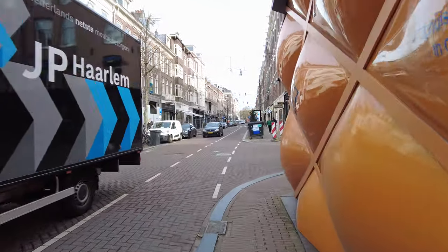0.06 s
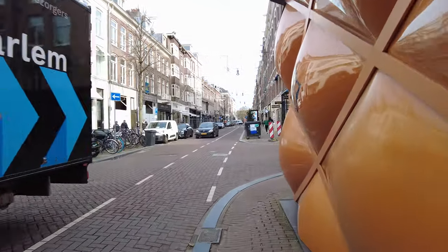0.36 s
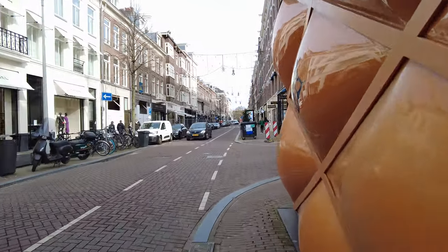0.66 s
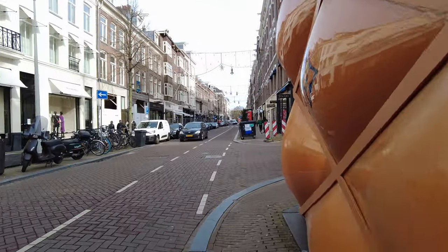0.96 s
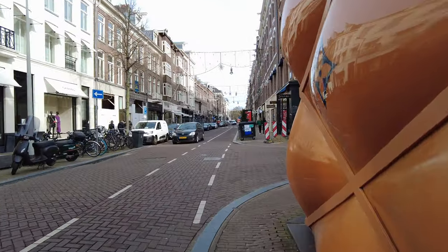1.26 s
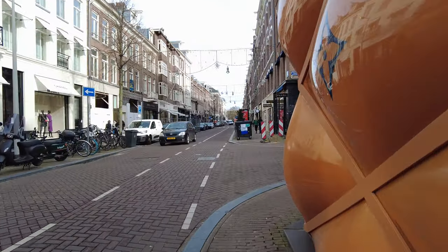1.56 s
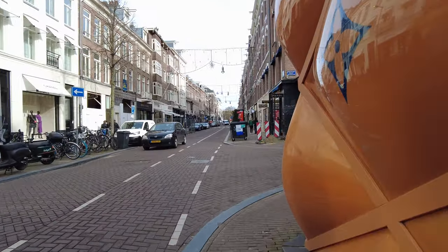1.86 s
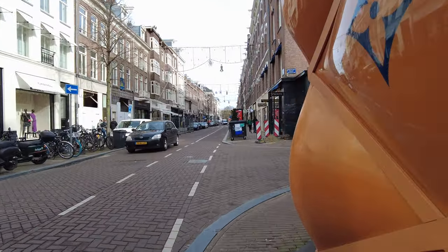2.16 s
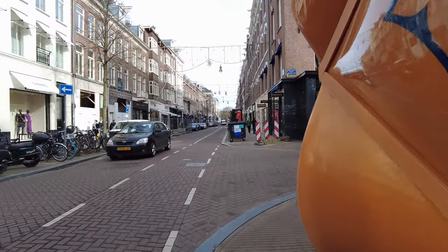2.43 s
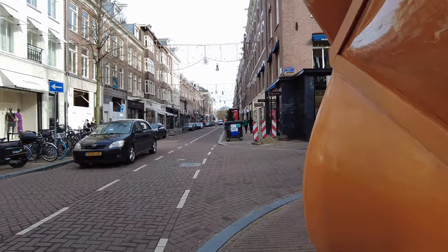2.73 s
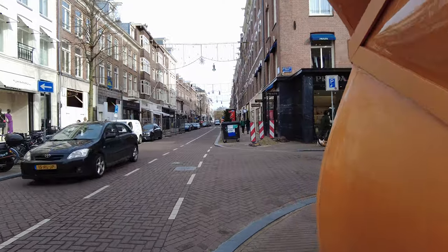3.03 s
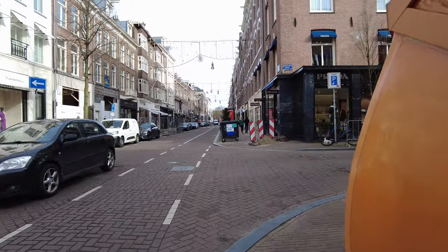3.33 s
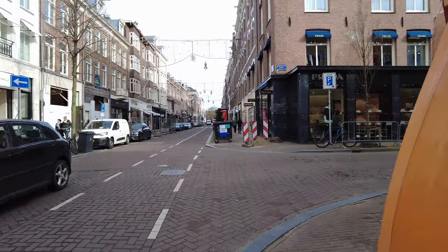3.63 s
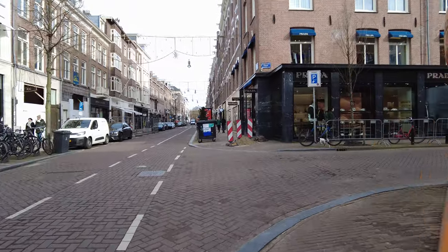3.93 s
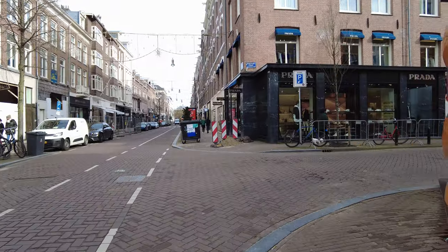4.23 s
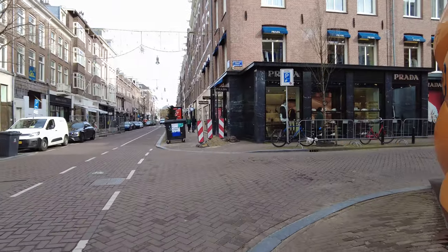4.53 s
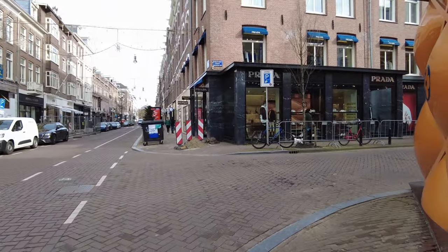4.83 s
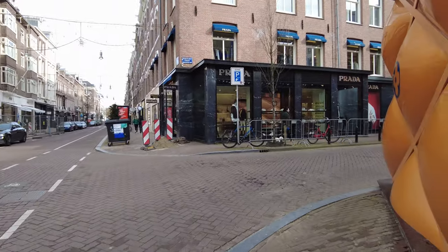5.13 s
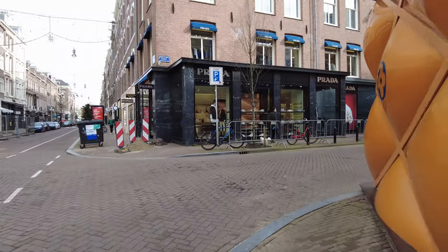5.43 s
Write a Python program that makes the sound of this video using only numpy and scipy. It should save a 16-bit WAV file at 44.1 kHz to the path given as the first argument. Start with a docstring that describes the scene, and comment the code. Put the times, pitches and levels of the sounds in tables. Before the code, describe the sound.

A diesel truck is close at the start, rolling slowly away along a brick-paved street. Its exhaust booms, strongest around 0.6 seconds, and its tyre roar fades gradually. The cargo box throbs deeply at bumps near 1.1 and 2.4 seconds. Faint brief hums and whirrs come and go over distant traffic. The engine swells twice, around 2.8 and 3.4 seconds.

Meanwhile an oncoming car approaches, its tyres roaring and hissing, and passes slightly to the left between 3.5 and 4 seconds, turning hollow as it goes. Loose bricks knock and clink from about 2.9 to 4.7 seconds, echoing briefly off the house fronts. At about 4 seconds a gust buffets the microphone with dull thumps. The truck's rumble drops and the sound narrows to mono by 4.8 seconds. The car's duller rolling noise and light wind flutter continue to the end, near 5.6 seconds.

```python
"""A diesel exhaust booms and a truck's box rumbles as it rolls slowly away along a brick-paved street.
Its treads roar; brief hums and whirrs come and go over far traffic. A car comes the other way and passes:
tyres roar and hiss, loose bricks knock and ring. House fronts echo the bricks and the diesel rattle.
Towards the end a breeze buffets the microphone and the stereo image closes."""
import sys
import numpy as np
from scipy import signal
from scipy.fft import rfft, irfft
from scipy.io import wavfile
from scipy.ndimage import uniform_filter1d, map_coordinates

SR = 44100
rng = np.random.default_rng(int(sys.argv[2]) if len(sys.argv) > 2 else 0)


def master_out(mix):
    """Clip the mix to full scale and print it as 16-bit PCM to the path in sys.argv[1]."""
    frames = np.transpose(np.atleast_2d(mix))
    ceiling = np.clip(frames, -1, 1)
    pcm = np.round(ceiling * 32767).astype(np.int16)
    wavfile.write(sys.argv[1], SR, pcm)


N = 250488
T = np.arange(N) / SR
FREQ = np.maximum(np.fft.rfftfreq(N, 1 / SR), 1)
SPEED_M_S, KERB_M = 7.04, 4.03  # both vehicles


def undb(db):
    """Decibels to gain."""
    return 10 ** (np.asarray(db) / 20)


def unit(x):
    """Scale the mid signal to rms 1."""
    return x / np.std(np.atleast_2d(x).mean(axis=0))


def ramp(start_s, length_s):
    """Linear rise from 0 to 1, then hold."""
    return np.clip((T - start_s) / length_s, 0, 1)


def swell(peak_s, attack_s, release_s):
    """Gaussian rise to 1 and fall."""
    return np.exp(-((T - peak_s) / np.where(T < peak_s, attack_s, release_s)) ** 2)


def noise():
    """Two independent white noises."""
    return rng.standard_normal((2, N))


def walk(rate_hz):
    """Random drift: held steps smoothed twice, rms 1."""
    hold = int(SR / rate_hz)
    steps = np.repeat(rng.standard_normal(N // hold + 1), hold)
    return unit(uniform_filter1d(uniform_filter1d(steps, hold), hold)[:N])


def tone(hz, waver):
    """Sine of rms 1; pitch wavers by a fraction."""
    cycles = np.cumsum(hz * (1 + waver * walk(60))) / SR
    return np.sqrt(2) * np.sin(2 * np.pi * (cycles + rng.random()))


def colour(x, outline):
    """Filter by a (frequency [Hz], gain [dB]) outline."""
    hz, db = np.transpose(outline)
    return irfft(rfft(x) * undb(np.interp(np.log(FREQ), np.log(hz), db)), N)


def band(x, lo_hz, hi_hz):
    """Steep band-pass."""
    return irfft(rfft(x) / np.sqrt((1 + (lo_hz / FREQ) ** 10) * (1 + (FREQ / hi_hz) ** 10)), N)


def ring(x, hz, q):
    """One resonance."""
    return signal.lfilter(*signal.iirpeak(hz, max(q, .3), fs=SR), x)


def pan(x, left_db):
    """Level difference, left over right."""
    return x * undb(np.array([left_db, -left_db]).reshape(2, -1) / 2)


def doublings(nearest_s, nearest_m=KERB_M):
    """Doublings of distance from a passing source's nearest point."""
    return np.log2(np.hypot(1, SPEED_M_S * (T - nearest_s) / nearest_m))


# Street diffuseness: (frequency [Hz], side minus mid [dB])
SIDE_SPECTRUM = [(60, -13), (130, -16), (260, -10.5), (450, -5.5), (750, 2), (1050, 6), (1190, -0.5),
                 (1290, -8), (1500, -8), (2200, -1.5), (3100, -1), (7000, -2), (14000, -0.5)]

def spread(pair):
    """Mid and side to stereo: bass alike in both ears, treble diffuse."""
    return pair[0] + colour(pair[1], SIDE_SPECTRUM) * np.array([[1], [-1]])


def street_echo(x, wet_db, t60_s=0.82):
    """House fronts return a scattered, dull tail to each side."""
    t = T[:SR]
    scatter = signal.lfilter([1], [1, -.6], rng.standard_normal((2, SR)))
    tail = scatter * undb(-60 * t / t60_s) * (t > .012)
    tail /= np.sqrt(np.sum(tail ** 2, axis=1, keepdims=True))
    return x + undb(wet_db) * signal.fftconvolve(np.atleast_2d(x), tail, axes=1)[:, :N]


def late_drop_db():
    """Boom, rumble and rattle drop away quickly as the stereo image closes."""
    return -8 * ramp(4.25, 0.31)


# Throttle pushes: (time [s], boost [dB], attack [s], release [s])
THROTTLE_PUSHES = [(2.78, 7, 0.3, 0.25), (3.38, 10.5, 0.11, 0.084)]
# Exhaust overtones: (frequency [x firing rate], relative level [dB])
ENGINE_ORDERS = [(2, -23), (3, -26), (5, -30), (6, -33.5), (7.5, -36), (10, -36), (11.5, -39)]

def exhaust(firings):
    """The tailpipe booms at the firing rate, louder when near and under load; weak overtones waver."""
    load_db = sum(db * swell(s, attack_s, release_s) for s, db, attack_s, release_s in THROTTLE_PUSHES)
    boom_db = -14.5 - 8 * doublings(nearest_s=0.61, nearest_m=3.7) + load_db + late_drop_db()
    boom = np.sin(2 * np.pi * firings) * undb(boom_db)
    overtones = np.zeros(N)
    for order, db in ENGINE_ORDERS:
        cycles = order * (firings + 0.016 * walk(8.3)) + rng.random()
        overtones += np.sin(2 * np.pi * cycles) * undb(db + 2 * walk(5))
    # overtones carry further than the boom
    return np.sqrt(2) * (boom + overtones * undb(0.67 * boom_db - 10))


# Dips in the paving: (time [s], level [dB])
BOX_JOLTS = [(1.14, -24), (1.87, -31), (2.41, -24.5), (2.9, -35), (3.35, -32.5)]
# Loose box rumble: (frequency [Hz], gain [dB])
BOX_SPECTRUM = [(12, -41), (19, -60), (25, 13.5), (30, 6.5), (45, 2.5), (70, -17), (120, -65)]

def box_rumble(box_hz=33.1, build_s=0.54, jolt_s=0.12):
    """The box throbs on one deep note, harder at each jolt, over a looser rumble."""
    rolling = undb(-35.5 + 2.5 * walk(5.4)) * ramp(0, build_s)
    jolts = sum(undb(db) * swell(s, jolt_s, jolt_s) for s, db in BOX_JOLTS)
    cycles = np.cumsum(box_hz + 0.847 * walk(8.47)) / SR
    throb = np.sqrt(2) * np.sin(2 * np.pi * cycles) * (rolling + jolts)
    loose = unit(colour(rng.standard_normal(N), BOX_SPECTRUM)) * undb(-31)
    return (throb + loose) * undb(late_drop_db())


def diesel_rattle(firings, block_hz=2840, q=3.4, decay_cycles=0.88):
    """Each firing rings the engine block: a dry rasp that carries down the street."""
    bursts = rng.standard_normal(N) * np.exp(-(firings % 1) / decay_cycles) * undb(2 * walk(40))
    block = ring(ring(bursts, block_hz, q), block_hz, q)
    level_db = -66.5 - 0.2 * doublings(0) + late_drop_db()
    return street_echo(unit(block) * undb(level_db), wet_db=-5)


def paving_patches(x, depth_db):
    """Each stretch of paving excites other resonances: narrow bands drift, mostly below 2 kHz."""
    hz, _, cells = signal.stft(x, SR, nperseg=2048, noverlap=1536)
    drift = rng.standard_normal(cells.shape[-2:])
    drift = uniform_filter1d(uniform_filter1d(drift, size=4, axis=0), size=7, axis=1)
    db = depth_db * drift / drift.std() / (1 + (hz[:, None] / 2200) ** 2)
    return signal.istft(cells * undb(db), SR, nperseg=2048, noverlap=1536)[1][..., :N]


def tyres(bands, spectrum, patter_db, patch_db, pulse=1):
    """The body drones, treads roar and rasp as they slap the bricks, grit hisses under them."""
    drone_db, roar_db, rasp_db, hiss_db = (db - fall_db * doublings(s) for s, db, fall_db in bands)
    patter = undb(patter_db * walk(70))
    grains = undb(2.2 * walk(1500))
    tread = colour(spread(paving_patches(noise() * pulse * patter, patch_db)), spectrum)
    grit = colour(spread(noise() * grains), spectrum)
    return (unit(band(tread, 154, 675)) * undb(drone_db + 0.14 * walk(19))
            + unit(band(tread, 762, 1844)) * undb(roar_db)
            + unit(band(grit * patter, 2010, 5300)) * undb(rasp_db)
            + unit(band(grit, 4870, 24000)) * undb(hiss_db))


# Truck drone, roar, rasp, hiss: (peak time [s], level [dB], loss per distance doubling [dB])
TRUCK_BANDS = [(0.25, -39, 5), (-0.48, -42, 5.5), (-0.57, -53, 5), (-0.44, -50, 10)]
# Truck rolling noise: (frequency [Hz], gain [dB])
TRUCK_SPECTRUM = [(150, -2), (200, -1.5), (250, -1.5), (330, -3), (400, -7.5), (520, -6.5), (750, -16.5),
                  (1050, -18), (1450, -16.5), (2200, -22), (3000, -25), (5000, -39), (7800, -43),
                  (8700, -46.5), (9600, -44), (10200, -49), (10900, -45.5), (11600, -51.5), (13000, -51),
                  (15000, -54)]

def truck_tyres(firings):
    """Receding rolling noise; drone and roar pulse with each diesel firing."""
    pulse = 1 + 0.21 * np.exp(-(firings % 1) / 0.6)
    return tyres(TRUCK_BANDS, TRUCK_SPECTRUM, patter_db=0.4, patch_db=3.5, pulse=pulse)


# Far traffic: (frequency [Hz], gain [dB])
TRAFFIC_SPECTRUM = [(35, -11.5), (62, 2), (100, -4.5), (130, -8), (200, -18), (500, -22.5), (1200, -39.5),
                    (2500, -52), (15000, -70.5)]

def far_traffic():
    """Far traffic hums between the houses."""
    return unit(spread(colour(noise(), TRAFFIC_SPECTRUM))) * undb(-37.5 + 1.1 * walk(5.63))


# Hums and whirrs: (time [s], relative level [dB], pitch [Hz], half-length [s])
HUM_NOTES = [(0.08, -40.5, 246, .16), (0.37, -43.5, 291, 0.13), (0.731, -40, 350, 0.21),
             (1.199, -44.5, 294.3, 0.27), (1.445, -46.5, 560, 0.11), (1.47, -42.5, 402, 0.15),
             (2.597, -42, 635, .06), (2.6, -45, 900, 0.031), (2.805, -39.5, 147.4, 0.22),
             (3.006, -38.5, 278.5, 0.029), (3.425, -42, 1254, 0.056), (3.525, -41, 245.8, 0.11),
             (3.716, -42, 1076, 0.05), (3.814, -42, 750, .03), (4.19, -41.5, 400, .06),
             (4.412, -43, 845, 0.019), (4.6, -44, 618, 0.061), (5.223, -47.5, 929, 0.11)]

def brief_hums(gain_db=-5.5, waver=.025):
    """Brief wavering hums and whirrs from engine and tyres."""
    out = np.zeros((2, N))
    for s, db, hz, half_s in HUM_NOTES:
        pair = np.array([tone(hz, waver), tone(hz, waver)])
        out += pair * undb(db + gain_db) * swell(s, half_s, half_s)
    return spread(out)


# Treble sizzles: (time [s], relative level [dB], half-length [s], centre [Hz], filter width [Hz])
SIZZLE_BURSTS = [(0.983, -72, 0.09, 14000, 5000), (1.15, -76, 0.12, 8100, 3500),
                 (1.2, -78, .1, 13700, 2500), (4.186, -63, .022, 4970, 3500), (5.38, -85, .22, 14200, 2000),
                 (5.435, -83, 0.02, 8840, 200)]

def sizzles(gain_db=6.5):
    """Faint, thin bands of treble noise swell and fade."""
    out = np.zeros(N)
    for s, db, half_s, hz, width_hz in SIZZLE_BURSTS:
        q = hz / width_hz
        hiss = ring(ring(rng.standard_normal(N), hz, q), hz, q)
        out += unit(hiss) * undb(db + gain_db) * swell(s, half_s, half_s)
    return out


# Oncoming drone, roar, rasp, hiss: (peak time [s], level [dB], loss per distance doubling [dB])
CAR_FRONT_BANDS = [(3.5, -42, 5.5), (3.51, -46.5, 3.66), (3.6, -52, 4.7), (4.1, -61.5, 3.9)]
# Oncoming rolling noise: (frequency [Hz], gain [dB])
CAR_FRONT_SPECTRUM = [(150, 0), (200, -7.5), (260, -2.5), (350, -9), (480, -13), (680, -17), (1000, -16.5),
                      (1350, -13), (1750, -19), (2300, -28), (3500, -35), (6000, -39.5), (10000, -42),
                      (15000, -44)]
# Rough stretches of brick: (time [s], boost [dB])
ROAR_SURGES = [(2.61, 1.5), (2.89, 3.5), (3.42, 4.5), (3.76, 3)]

def car_coming(surge_s=0.11):
    """The tyres' roar surges on rough paving; the finest hiss is shaded until the car's tyres come into view."""
    rolling = tyres(CAR_FRONT_BANDS, CAR_FRONT_SPECTRUM, patter_db=1.1, patch_db=3)
    surge_db = sum(db * swell(s, surge_s, surge_s) for s, db in ROAR_SURGES)
    rolling += (undb(surge_db) - 1) * band(rolling, 795, 1760)
    shade_db = -6.5 * (1 - ramp(2.72, .15))
    return rolling + (undb(shade_db) - 1) * band(rolling, 9800, SR)


def ear_lag(x, abreast_s=3.84, max_lag_samples=5.5):
    """The car passes on the left: the nearer it is, the more the right ear lags."""
    lag_samples = max_lag_samples / 2 ** doublings(abreast_s)
    right = map_coordinates(x[1], [np.arange(N) - lag_samples], order=3, mode="nearest")
    return np.array([x[0], right])


# Gliding dips and humps: (time [s], centre [Hz], half-width [oct], glide [oct/s],
# mid gain [dB], side gain [dB], attack [s], release [s])
PASS_SWEEPS = [(2.55, 835, 0.33, 0.099, 3, -2, 1, 0.64), (3.18, 660, .25, -.6, -5, -8, 0.083, 0.17),
               (3.6, 590, 0.28, -0.26, -4.5, -6, 0.29, .25), (3.68, 830, .08, -0.84, 4.5, 2, 0.22, 0.23),
               (3.72, 930, 0.088, -0.65, -8, -5, .2, .2), (4.0, 780, 0.62, -0.94, -8, 1, 0.06, 0.086),
               (3.95, 3800, 0.18, .9, 4, 2.5, 0.13, 0.066), (4.03, 1390, 0.13, 0, 4, -1, 0.077, 0.11),
               (4.125, 3100, 0.77, 0.96, -5.5, -7, 0.044, 0.24), (4.25, 5200, 0.33, 0, 4.5, 4, 0.065, 0.12)]

def hollow_pass(x):
    """The road noise turns hollow and phasey as the car goes by."""
    mid_side = np.array([x[0] + x[1], x[0] - x[1]]) / 2
    hz, t, (mid, side) = signal.stft(mid_side, SR, nperseg=1024, noverlap=768)
    for s, centre_hz, width_oct, glide_oct_s, mid_db, side_db, attack_s, release_s in PASS_SWEEPS:
        offset_oct = np.log2(np.maximum(hz, 1)[:, None] / centre_hz) - glide_oct_s * (t - s)
        depth = np.exp(-(offset_oct / width_oct) ** 2) * np.interp(t, T, swell(s, attack_s, release_s))
        mid, side = mid * undb(mid_db * depth), side * undb(side_db * depth)
    return signal.istft(np.array([mid + side, mid - side]), SR, nperseg=1024, noverlap=768)[1][:, :N]


# Wheel strikes: (time [s], level [dB], ring [Hz], t60 [s], stereo width [0-1])
BRICK_STRIKES = [(2.852, -39.5, 1330, 0.11, .3), (2.86, -46, 2100, .09, 0.9), (3.354, -51, 1280, .09, .6),
                 (3.474, -41, 1250, 0.081, .4), (3.784, -42, 1280, 0.097, 0.5),
                 (4.052, -49.5, 2330, 0.11, 0.9), (4.172, -44, 650, .1, 0), (4.29, -44, 524, 0.088, .4),
                 (4.465, -41.5, 450, 0.14, 0.1), (4.568, -35, 950, 0.046, 0), (4.737, -40, 840, .08, .1)]

def brick_knocks(crack_db=-9):
    """A wheel tips a loose brick or meets a joint: a gritty crack and a short stony ring."""
    out = np.zeros((2, N))
    t = T[:SR // 4]
    for s, db, hz, t60_s, width in BRICK_STRIKES:
        blow = rng.standard_normal((2, len(t)))
        stone = ring(blow, hz, q=2) + undb(crack_db) * blow
        mid, side = ring(ring(stone, hz, q=1), hz, q=1)
        knock = unit(mid + width * side * np.array([[1], [-1]]))
        start = int(s * SR)
        out[:, start:start + len(t)] += knock * undb(db - 60 * t / t60_s)
    return street_echo(out, wet_db=-8.5)


# Rocking bricks: (time [s], level [dB], pitch [Hz])
BRICK_NOTES = [(2.868, -48.5, 1590), (2.941, -38.5, 1104)]

def brick_clinks(attack_s=0.017, release_s=0.022, waver=0.0065):
    """A rocking brick rubs its neighbour and rings briefly on one clear note."""
    notes = sum(tone(hz, waver) * undb(db) * swell(s, attack_s, release_s) for s, db, hz in BRICK_NOTES)
    return street_echo(notes, wet_db=-8)


# Wind flutter: (frequency [Hz], gain [dB])
BREEZE_SPECTRUM = [(15, -9), (30, -6), (60, 9), (120, -9), (190, -16), (320, -24), (800, -80)]
# Single eddies: (time [s], peak [dB], centre [Hz])
EDDY_THUMPS = [(4.04, -19, 58), (4.088, -20, 52), (4.09, -28, 200), (4.116, -24.5, 140), (4.156, -20, 80),
               (4.171, -21.5, 100), (4.34, -26, 155), (4.366, -19, 50), (4.472, -23.5, 120),
               (4.492, -24.5, 165), (4.7, -25, 65), (5.261, -21.5, 110), (5.297, -25, 60),
               (5.319, -24.5, 110), (5.45, -28, 50), (5.473, -28, 80), (5.59, -23, 95), (5.613, -23, 100),
               (5.62, -26.5, 164)]

def breeze(gust_db=8):
    """Eddies flutter on the microphone, with one gust; the strongest push and pull once, a dull thump."""
    level_db = -37 + gust_db * swell(4.09, attack_s=0.087, release_s=0.23)
    flutter = unit(colour(rng.standard_normal(N), BREEZE_SPECTRUM) * undb(walk(25)))
    out = flutter * ramp(3.72, 0.33) * undb(level_db)
    for s, peak_db, hz in EDDY_THUMPS:
        phase = 2 * np.pi * hz * (T - s)
        out -= phase * np.exp((1 - phase ** 2) / 2) * undb(peak_db)
    return out


# Receding drone, roar, rasp, hiss: (peak time [s], level [dB], loss per distance doubling [dB])
CAR_REAR_BANDS = [(4.6, -42.5, 3.9), (4.57, -50.5, 4.9), (3.6, -56, 8.7), (3.8, -67, 13.4)]
# Receding rolling noise: (frequency [Hz], gain [dB])
CAR_REAR_SPECTRUM = [(150, -0.5), (260, -3.5), (400, -11), (620, -14), (850, -10), (1150, -10.5),
                     (1600, -17), (2200, -28), (3000, -35), (4500, -37.5), (7000, -46), (11000, -53),
                     (15000, -59)]

def car_going():
    """From behind, the car is lower and hollower; its level sinks at the end."""
    rolling = tyres(CAR_REAR_BANDS, CAR_REAR_SPECTRUM, patter_db=1.5, patch_db=3.5)
    return rolling * undb(-2.5 * ramp(5.3, 0.65))


def scene():
    """The truck leaves, revving slightly; the car comes and goes; the breeze picks up."""
    firing_hz = (46.92 + 2.8 * ramp(2.1, 1.3)) * (1 + 0.0069 * walk(12))
    firings = np.cumsum(firing_hz) / SR
    truck = truck_tyres(firings)
    passed = ramp(3.994, 0.57)
    car = ear_lag(car_coming() * np.sqrt(1 - passed)) + car_going() * np.sqrt(passed)
    bricks = brick_knocks() + brick_clinks()
    hums = brief_hums()
    bass = pan(exhaust(firings) + box_rumble(), left_db=-2.5 * (1 - ramp(3.5, .15)))
    road = hollow_pass(truck + car + diesel_rattle(firings) + far_traffic())
    return bass + road + bricks + hums + breeze() + sizzles()


def record(dry, top_hz=15700, fade_s=.002):
    """Above the bass the image leans left; it closes to mono and the deep bass thins. The top is cut."""
    width = 1 - ramp(4.345, 0.47)
    mid = dry.mean(axis=0)
    image = mid + width * (dry - mid)
    image -= 0.24 * np.clip(1 - 2 * width, 0, 1) * band(image, 2.7, 68)
    bass = signal.sosfiltfilt(signal.butter(2, 200, fs=SR, output="sos"), image)
    image = bass + pan(image - bass, left_db=0.86 * width)
    soft_ends = np.clip(np.minimum(T, T[-1] - T) / fade_s, 0, 1)
    return signal.sosfilt(signal.ellip(12, .1, 80, top_hz, fs=SR, output="sos"), image * soft_ends)


dry = scene()
out = record(dry)
master_out(out)
```